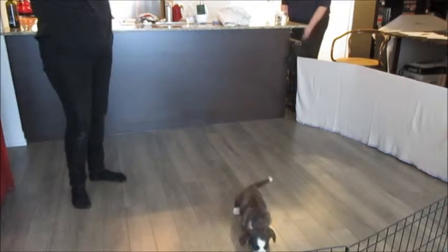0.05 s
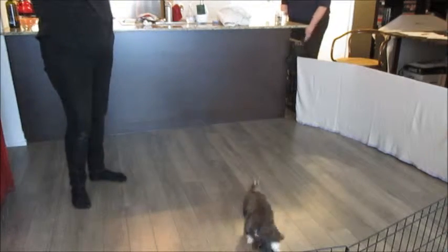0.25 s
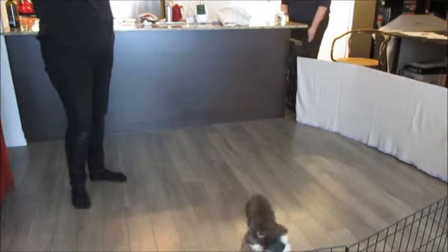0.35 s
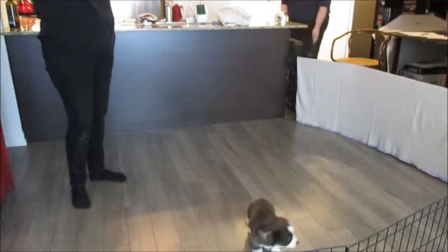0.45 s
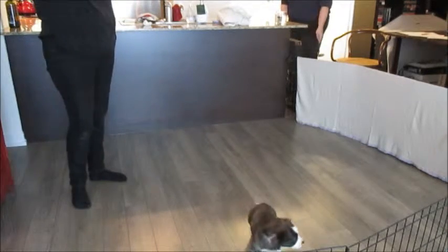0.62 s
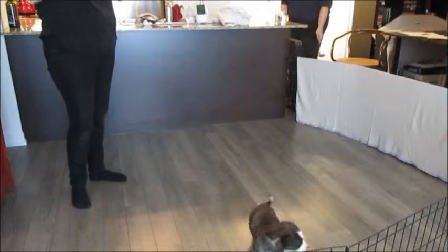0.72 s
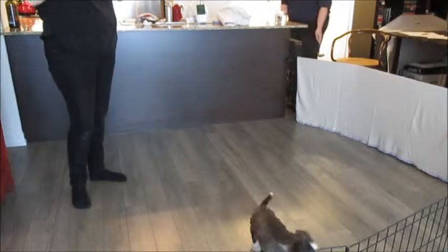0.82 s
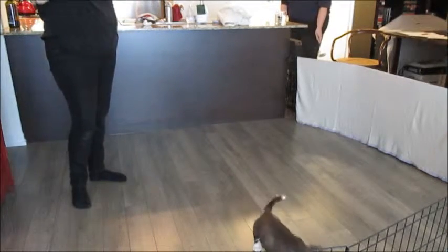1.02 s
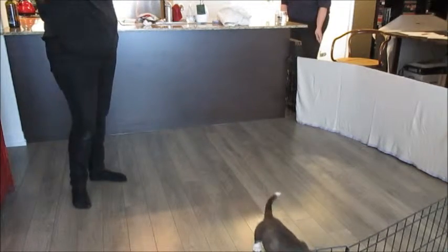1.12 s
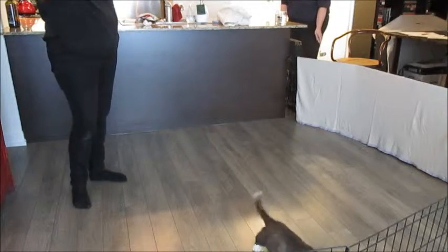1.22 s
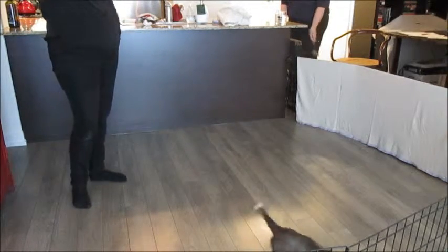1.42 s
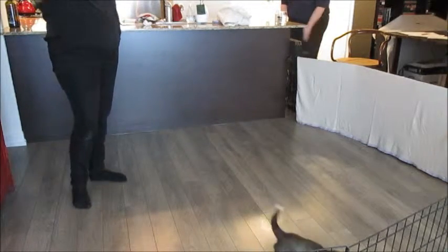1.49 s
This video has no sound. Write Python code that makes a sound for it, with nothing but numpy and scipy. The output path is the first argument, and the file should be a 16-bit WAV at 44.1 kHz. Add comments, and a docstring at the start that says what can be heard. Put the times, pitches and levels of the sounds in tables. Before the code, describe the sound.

Something metal is struck once near the microphone and rings briefly in a room. Around it, a puppy walks on a hard floor with faint claw ticks, soft steps and scuffs.

```python
"""A puppy's paws scuff, pad and tick on a hard floor, over the dull air and low hum of a room.
A moment in, a metal object is struck once, close to the microphone. Its modes clang and die quickly,
all but one beating partial that sings on while the puppy walks about. The recorder's gain control
ducks the room at the blow and lets it back slowly."""
import sys
import numpy as np
from scipy import signal
from scipy.fft import rfft, irfft
from scipy.io import wavfile
from scipy.ndimage import uniform_filter1d

SR = 44100
rng = np.random.default_rng(int(sys.argv[2]) if len(sys.argv) > 2 else 0)


def materialize(psi):
    """Save the field psi as 16-bit PCM at rate SR to the path in sys.argv[1].

    A 1-D psi becomes a single channel; in a 2-D psi each row is a channel.
    """
    bounded = np.clip(np.atleast_2d(psi).T, -1, 1)
    quanta = np.round(bounded * 32767).astype(np.int16)
    wavfile.write(sys.argv[1], SR, quanta)


N = 68355
STRIKE_S = 0.2299


def undb(db):
    """Decibels to gain."""
    return 10 ** (np.asarray(db) / 20)


def over_hz(points, hz):
    """Read (Hz, value) points on a log-frequency axis."""
    at, value = np.array(points).T
    return np.interp(np.log(hz + 1), np.log(at), value)


def noise(colour, tilt_db=0):
    """Coloured noise of rms 1, tilted in dB per octave."""
    hz = np.arange(N // 2 + 1) * SR / N
    gain = undb(over_hz(colour, hz) + tilt_db * np.log2(hz + 1))
    x = irfft(rfft(rng.standard_normal(N)) * gain, N)
    return x / x.std()


def tint(x, colour):
    """Causal filter with the given (Hz, dB) colour and unit power gain."""
    cepstrum = irfft(np.log(undb(over_hz(colour, np.linspace(0, SR / 2, 1025)))))
    causal = np.r_[cepstrum[0], 2 * cepstrum[1:1024]]
    response = irfft(np.exp(rfft(causal, 2048)))
    return signal.fftconvolve(x, response / np.linalg.norm(response))[:N]


def since(start):
    """Seconds since a moment."""
    return np.arange(N) / SR - start


def fade(start, t60):
    """Sudden start, then a fall of 60 dB every t60 seconds."""
    t = since(start)
    return (t >= 0) * np.exp(-np.log(1000) * np.abs(t) / t60)


def room_tone(hum_hz=58):
    """The room's dull steady air, with a low hum."""
    # Each row: frequency in Hz, relative noise density in dB.
    air_colour = [(20, -6), (60, -1.5), (110, -7.5), (280, -7.5), (700, -15), (1500, -21.5), (5000, -32),
                  (10000, -36), (15500, -45)]
    return undb(-48) * noise(air_colour) + undb(-50.5) * np.sin(2 * np.pi * hum_hz * since(0))


def scuffs(grain_db=3):
    """Paws rub the floor and something rustles: grainy noise that swells and dies away."""
    # Each row: peak time in seconds, level in dB, rise and t60 in seconds, tilt in dB per octave.
    rubs = [(.003, -39.5, 0.0024, 0.09, -3), (.135, -45.5, 0.037, 0.24, -5.5),
            (0.201, -45, 0.0079, 0.11, 1.5), (0.506, -54, .008, 0.098, 3), (.615, -49, 0.014, 0.14, -4),
            (0.789, -53, 0.025, 0.097, 3.5), (.98, -48, 0.016, .18, -5), (1.059, -40, 0.0029, 0.084, -3),
            (1.31, -57, .012, 0.13, 16), (1.464, -36.5, 0.018, 0.097, 2)]
    # Each row: frequency in Hz, relative noise density in dB.
    rub_colour = [(100, -16.5), (350, -14.5), (650, 2), (1500, -6.5), (3000, 0), (4500, 2), (7000, -5.5),
                  (11000, -16.5), (16000, -36.5)]
    out = 0
    for peak, db, rise, t60, tilt in rubs:
        t = since(peak)
        grain = uniform_filter1d(rng.standard_normal(N), size=60)
        swell = np.where(t < 0, np.exp(-np.abs(t) / rise), fade(peak, t60))
        out = out + noise(rub_colour, tilt) * swell * undb(db + grain_db * grain / grain.std())
    return out


def room(x, delay_s=0.0037):
    """Diffuse reflections reach the microphone just after the direct sound; the top dies first."""
    # Each row: frequency in Hz, reverberation time in seconds.
    decay_times = [(100, 0.28), (300, 0.35), (600, 0.41), (2000, 0.49), (5000, .37), (10000, 0.22),
                   (16000, 0.22)]
    edges = np.geomspace(20, SR / 2, 15)
    hz = np.arange(N // 2 + 1) * SR / N
    white = rfft(rng.standard_normal(N))
    tail = 0
    for lo, hi in zip(edges, edges[1:]):
        band = irfft(white * ((hz >= lo) & (hz < hi)), N)
        tail = tail + band * fade(delay_s, over_hz(decay_times, np.sqrt(lo * hi)))
    return signal.fftconvolve(x, tail / np.linalg.norm(tail))[:N]


def paw_pads():
    """Soft pads land on the floor, each a dull burst of noise."""
    # Each row: start in seconds, level in dB.
    steps = [(.075, -74), (.145, -51), (.882, -42.5), (.96, -45), (1.09, -45), (1.49, -45)]
    # Each row: frequency in Hz, relative noise density in dB.
    pad_colour = [(50, -3.5), (250, -5.5), (550, 1), (1200, -18), (4000, -37)]
    return noise(pad_colour) * sum(undb(db) * fade(start, t60=0.071) for start, db in steps)


def claw_ticks():
    """Claws meet the hard floor, each a very short, bright burst."""
    # Each row: start in seconds, level in dB.
    ticks = [(.1855, -40), (.4394, -37), (.4944, -40), (.7824, -50.5), (.9582, -46), (.9744, -50),
             (1.0494, -44), (1.2894, -48.5), (1.3024, -41.5)]
    # Each row: frequency in Hz, relative noise density in dB.
    tick_colour = [(300, -21), (2000, -7.5), (5000, 1.5), (11500, -4), (16000, -19.5)]
    return noise(tick_colour) * sum(undb(db) * fade(start, t60=0.015) for start, db in ticks)


def puppy(wet_db=-1.5):
    """Claws, paws and scuffs, heard with nearly as much room as direct sound."""
    direct = claw_ticks() + paw_pads() + scuffs()
    return direct + undb(wet_db) * room(direct)


def mode(hz, db, t60):
    """One decaying partial of the struck metal."""
    return undb(db) * fade(STRIKE_S, t60) * np.sin(2 * np.pi * hz * since(STRIKE_S))


def struck_metal(split_hz=13.5, sing_hz=2415.5, beat_hz=4.5, radiates_above_hz=290):
    """A close blow cracks, crashes and leaves pairs of modes beating; the metal radiates little bass."""
    # Each row: frequency in Hz, relative level in dB, t60 in seconds.
    modes = [(255, -33, .25), (425, -21, .1), (580, -27, .38), (808, -19, .3), (896, 1, .34),
             (1038, -16, .24), (1428, -18, .34), (1486, -9, .2), (1584, -12, .38), (1614, -15, .3),
             (1694, -23, .28), (2215, -22, .25), (2380, -16, .28), (2485, -17, .16), (3244, -15, .3),
             (3644, -23, .28), (3690, -23, .33), (4745, -20, .25), (4935, -19, .1), (5130, -20, .1),
             (5286, -19, .28), (7230, -28, .22), (8200, -38, .24), (10075, -32, .21), (11645, -44, .16),
             (12825, -42, .19)]
    # Dense, short-lived modes at the contact. Each row: frequency in Hz, relative density in dB.
    crash_colour = [(150, -19), (300, -10.5), (600, -7.5), (950, -8), (1900, -2), (2600, -3), (4200, -12),
                    (5100, -6.5), (7000, -19), (8800, -26.5), (12500, -27), (16000, -41.5)]
    ring = 0
    for k, (hz, db, t60) in enumerate(modes):
        polarity = (-1) ** (k // 2)
        weaker_twin = mode(hz - split_hz, db - 7, t60)
        ring = ring + undb(2.5) * polarity * (mode(hz, db, t60) + weaker_twin)
    sing = mode(sing_hz, db=-7.5, t60=0.81) - mode(sing_hz + beat_hz, db=-13.5, t60=0.81)
    crack = undb(5.5) * fade(STRIKE_S, t60=0.014)
    burst = crack + undb(-3) * fade(STRIKE_S, t60=0.058)
    crash = tint(burst * rng.standard_normal(N), crash_colour)
    reflections = room(undb(-5.5) * ring + undb(-7) * crash)
    bass_cut = signal.butter(2, radiates_above_hz, "high", fs=SR, output="sos")
    return undb(8) * signal.sosfilt(bass_cut, ring + sing + crash + reflections)


def scene():
    """One microphone in the room, close to the metal object."""
    return (struck_metal() + puppy() + room_tone())[None]


def record(dry, ceiling_db=-2, recover_db_per_s=7.5, detect_s=0.0029, top_hz=15600):
    """Gain control drops at once and recovers slowly; the first peaks still clip; the top is cut."""
    power = uniform_filter1d(dry[0] ** 2, int(detect_s * SR))
    level_db = 10 * np.log10(np.abs(power) + 1e-12)
    recovery = recover_db_per_s * since(0)
    held_db = np.maximum.accumulate(level_db + recovery) - recovery
    gain = undb(np.minimum(ceiling_db - held_db, 0))
    clipped = np.clip(dry * gain, -1, 1)
    top_cut = signal.ellip(8, .2, 60, top_hz, fs=SR, output="sos")
    return signal.sosfilt(top_cut, clipped)


dry = scene()
out = record(dry)
materialize(out)
```